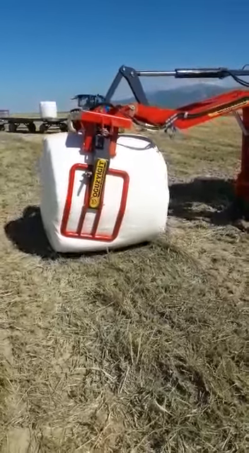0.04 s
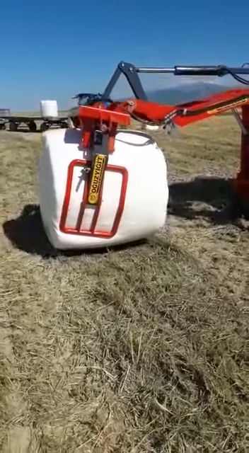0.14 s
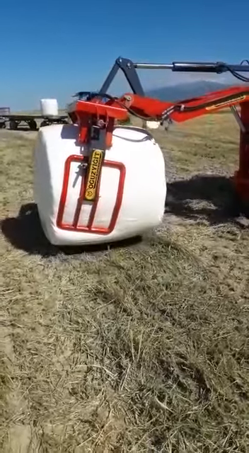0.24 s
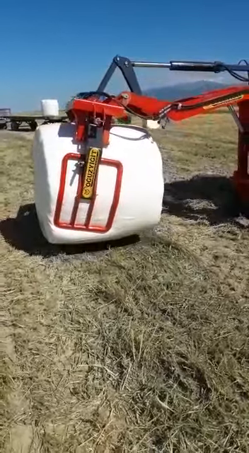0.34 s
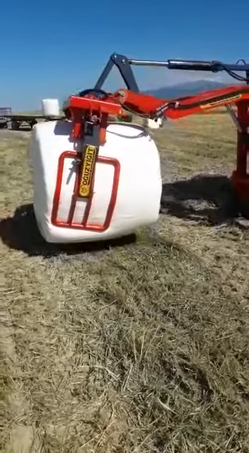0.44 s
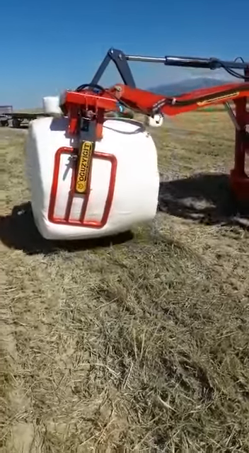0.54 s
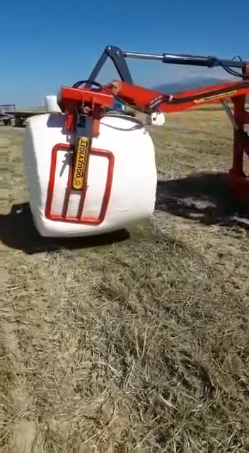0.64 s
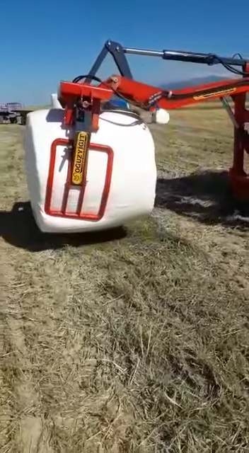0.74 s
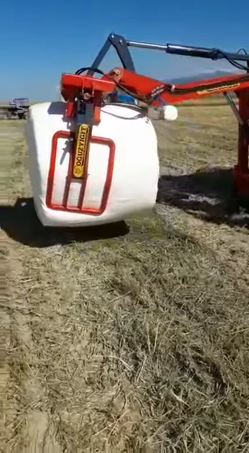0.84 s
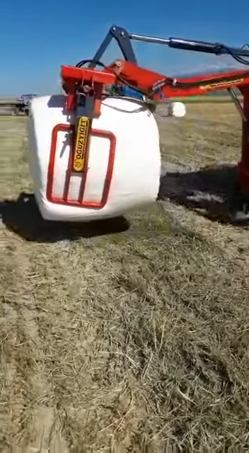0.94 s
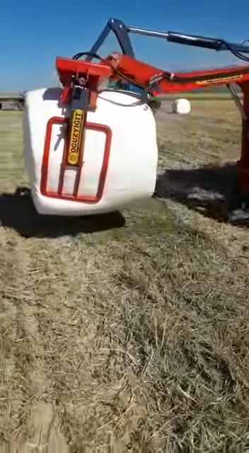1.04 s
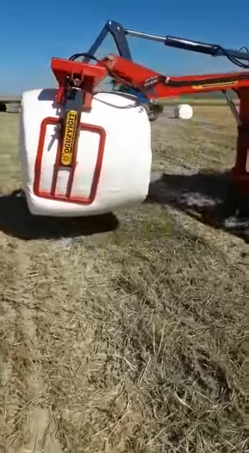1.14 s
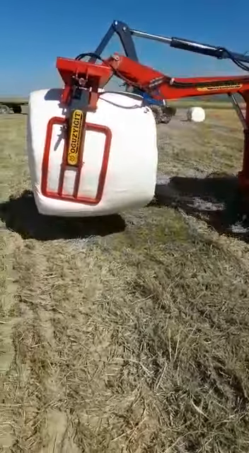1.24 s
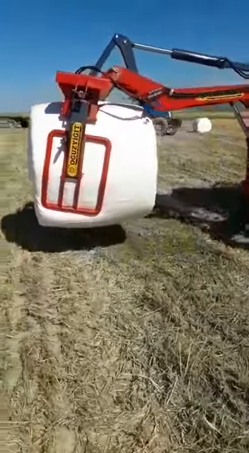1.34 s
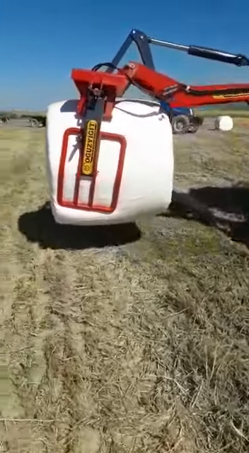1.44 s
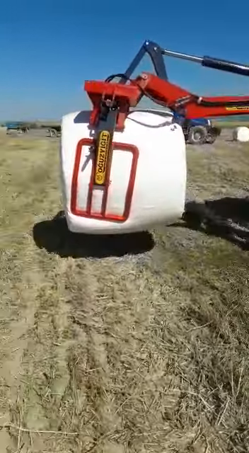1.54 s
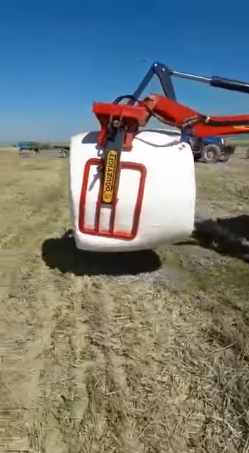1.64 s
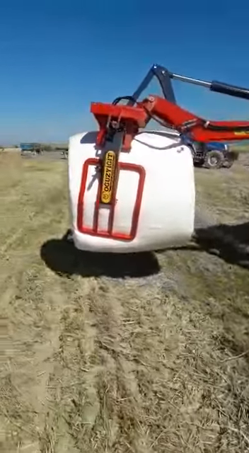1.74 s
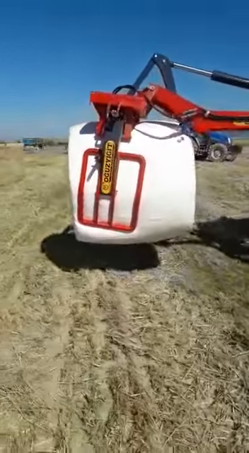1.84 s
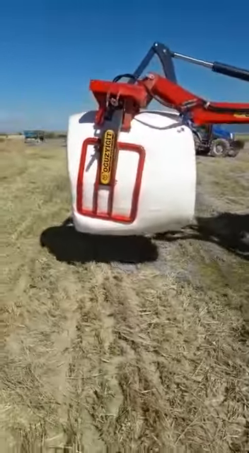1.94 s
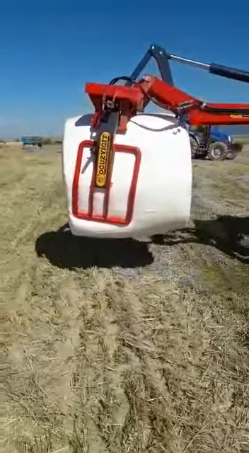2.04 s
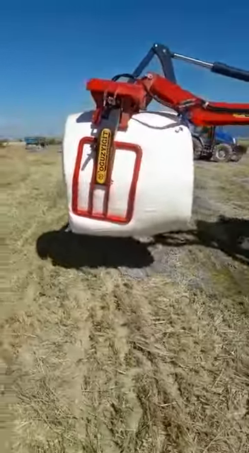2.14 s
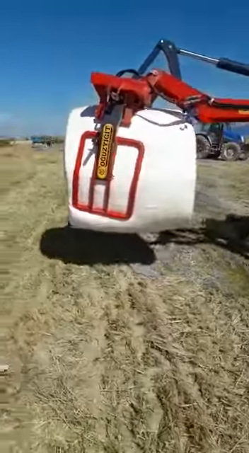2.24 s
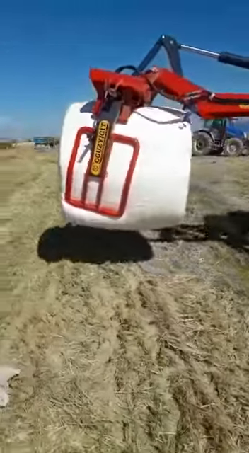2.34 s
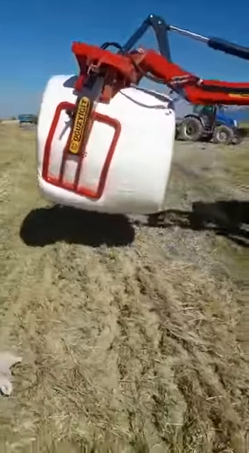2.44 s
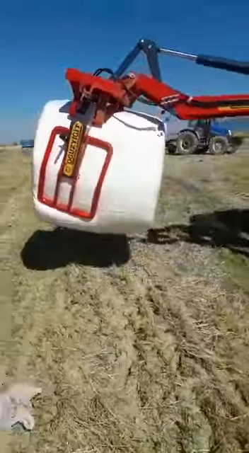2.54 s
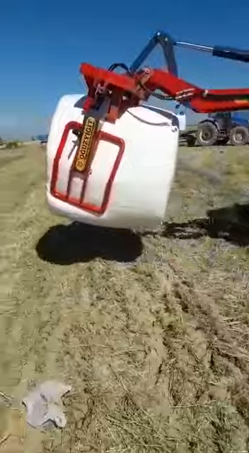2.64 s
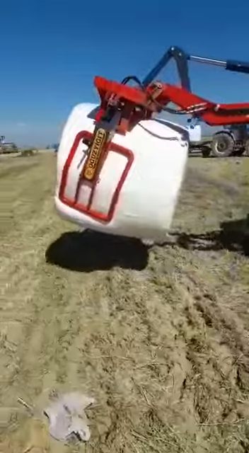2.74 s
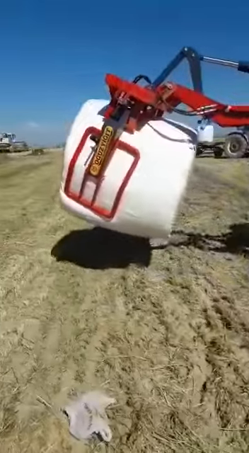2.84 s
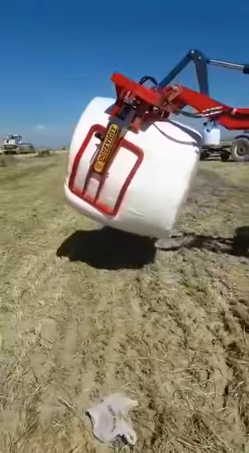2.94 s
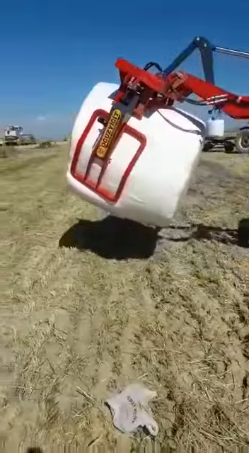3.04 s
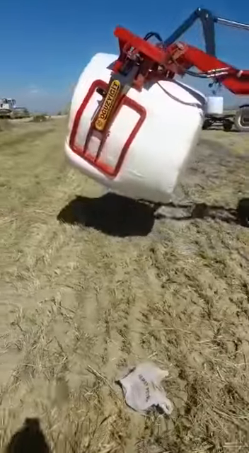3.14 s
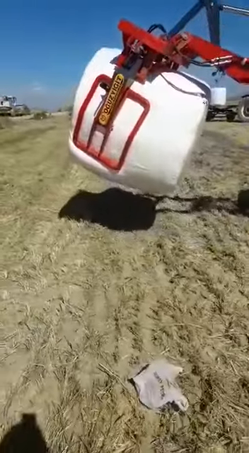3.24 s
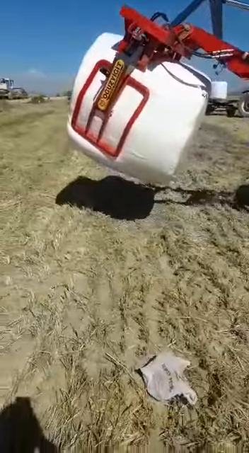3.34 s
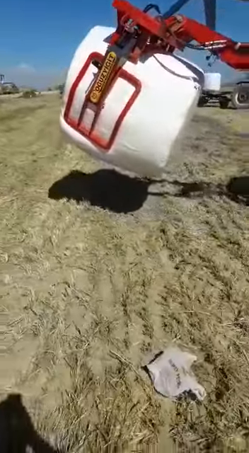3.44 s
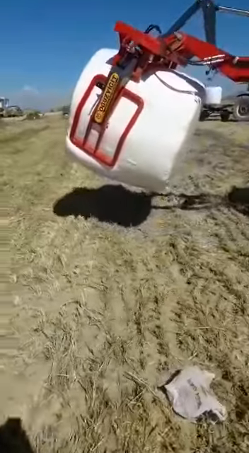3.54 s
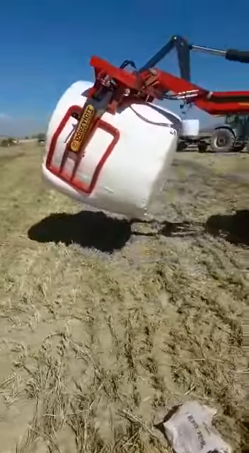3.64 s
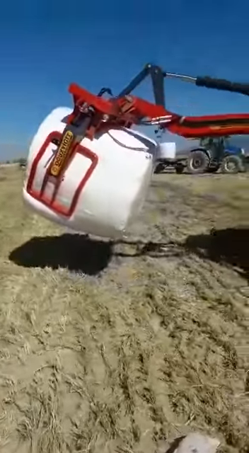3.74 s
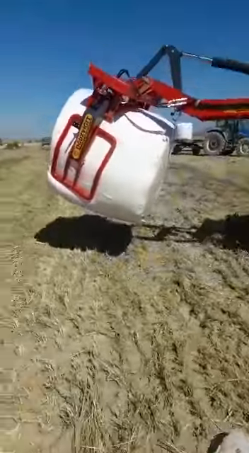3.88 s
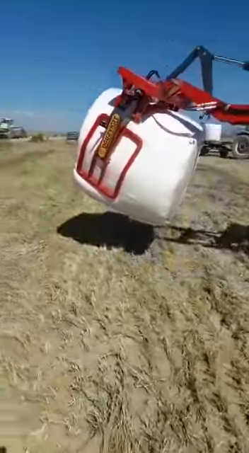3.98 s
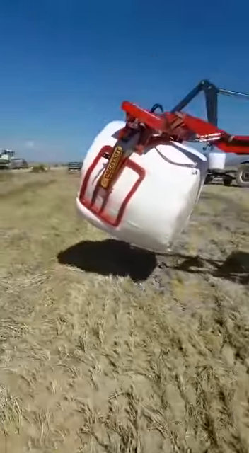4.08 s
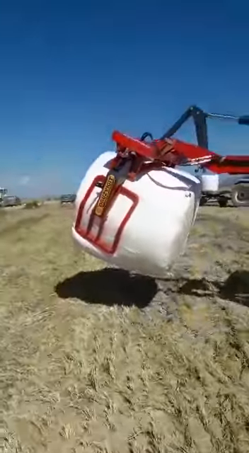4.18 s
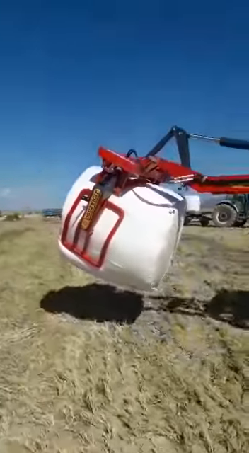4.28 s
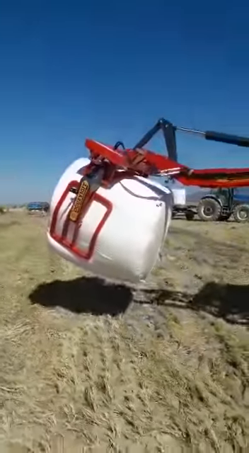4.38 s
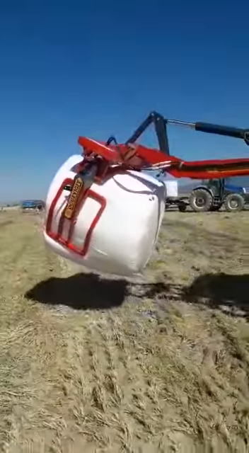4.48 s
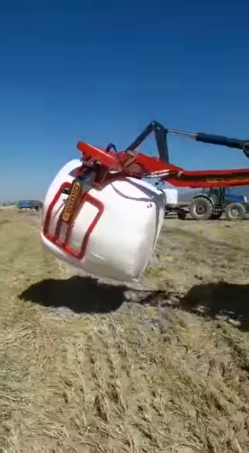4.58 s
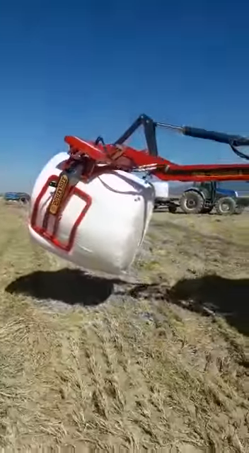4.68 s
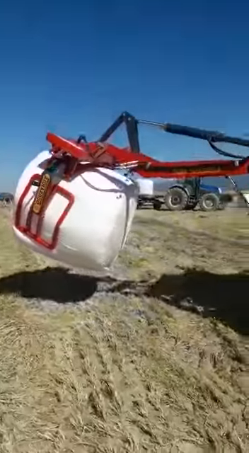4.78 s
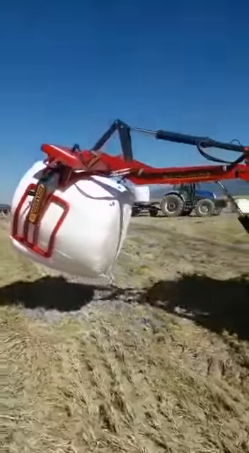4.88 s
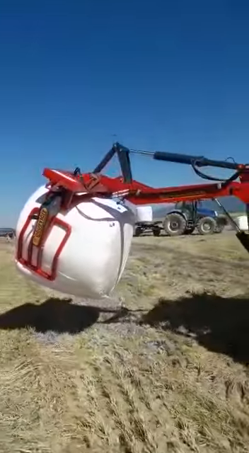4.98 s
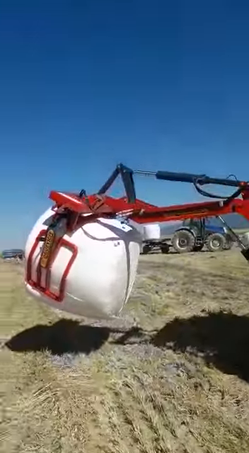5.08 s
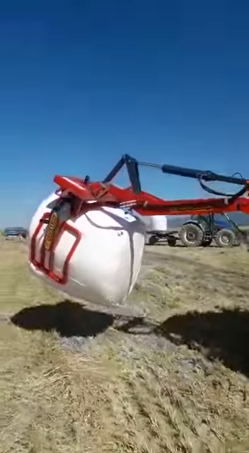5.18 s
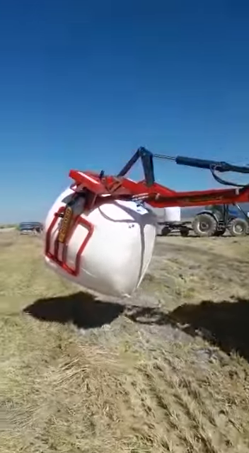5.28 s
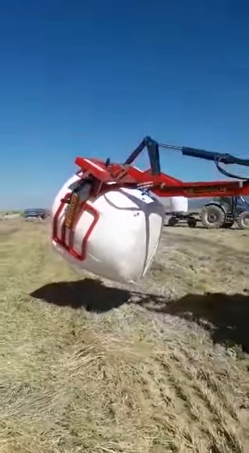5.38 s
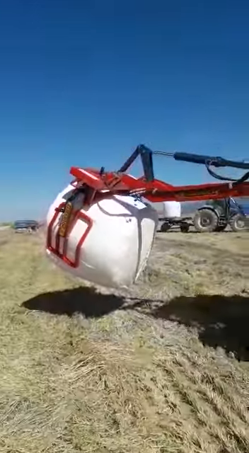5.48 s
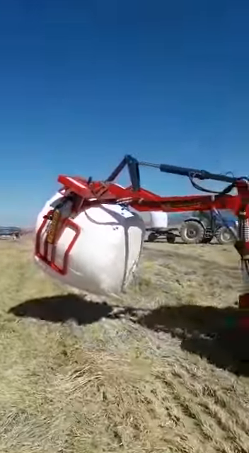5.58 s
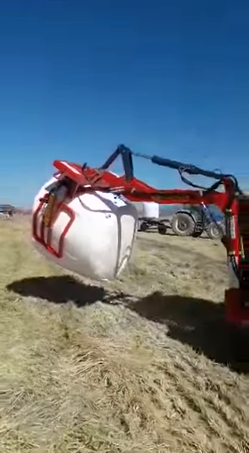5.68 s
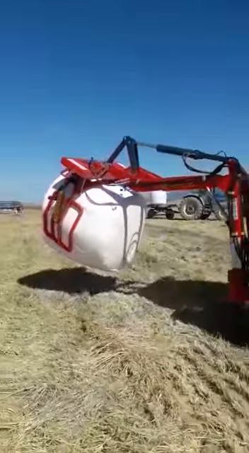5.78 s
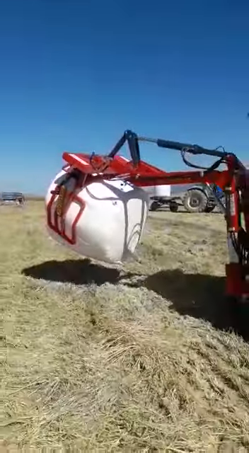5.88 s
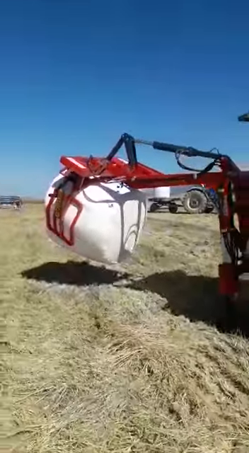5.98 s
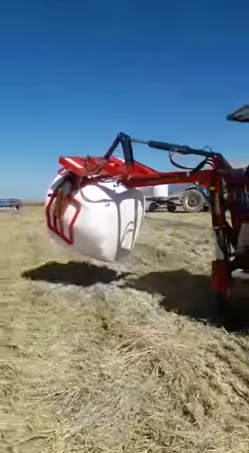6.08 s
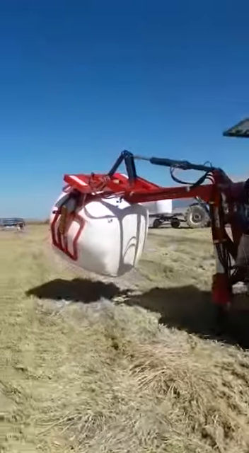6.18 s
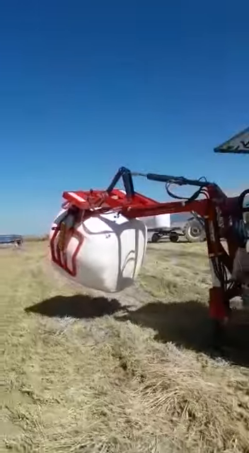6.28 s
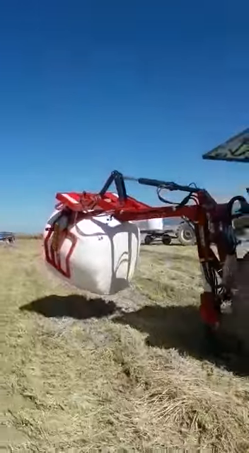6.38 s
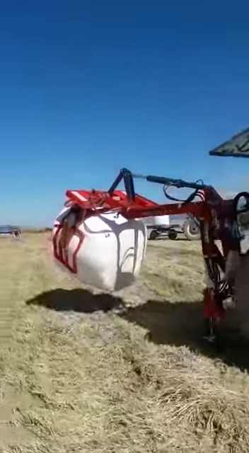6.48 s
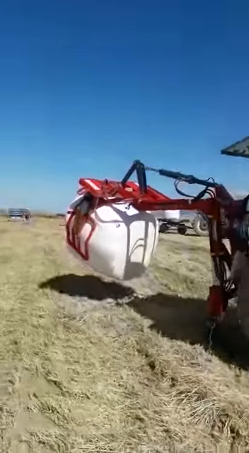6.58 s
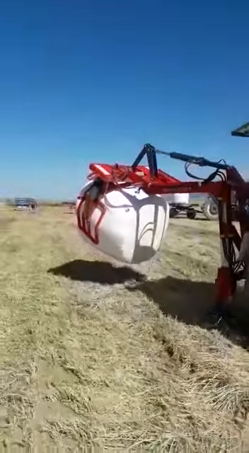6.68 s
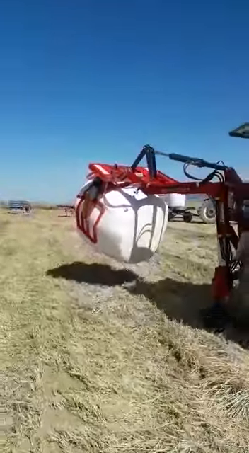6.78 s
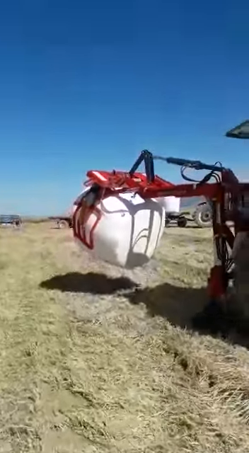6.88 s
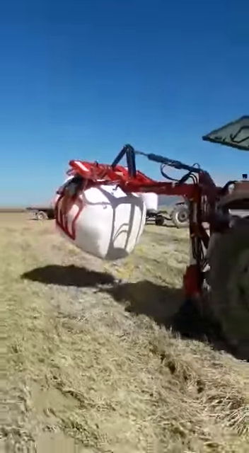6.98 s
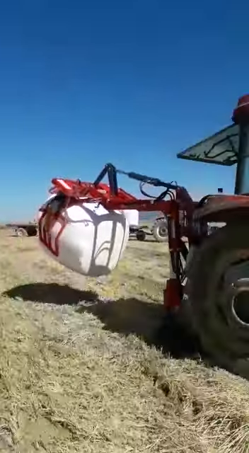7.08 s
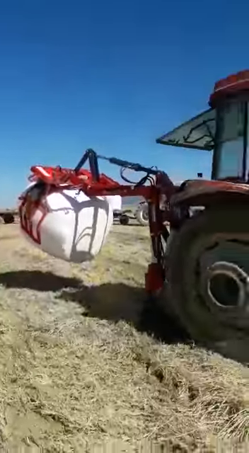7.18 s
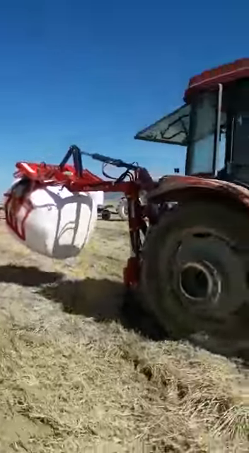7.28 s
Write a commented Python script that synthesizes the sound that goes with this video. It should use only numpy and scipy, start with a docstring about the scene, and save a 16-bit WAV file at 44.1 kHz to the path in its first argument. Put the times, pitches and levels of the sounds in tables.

```python
"""A diesel tractor idles in an open field, then lifts a wrapped bale with its oil-powered crane. The engine
clatters harder as the oil pump takes the load, then revs up and comes nearer, gears whining. Faint whines glide
now and then, the crane's arm clunks once and rumbles on, and there are hard clacks, dull thumps, a scuff, tiny
ticks and light wind. One loudness curve, the engine's clatter, leads the exhaust, the rattle, the whine and the
hiss, each by its own amount."""
import sys
import numpy as np
from scipy import signal
from scipy.fft import rfft, irfft, next_fast_len
from scipy.io import wavfile

SR = 44100
rng = np.random.default_rng(int(sys.argv[2]) if len(sys.argv) > 2 else 0)


def wav_out(sig):
    """Save sig, one row per channel (or a flat mono array), as 16-bit PCM at SR to the path in sys.argv[1]."""
    wavfile.write(sys.argv[1], SR, np.round(np.clip(np.atleast_2d(sig).T, -1, 1) * 32767).astype(np.int16))


N = 322812

# how hard each of the four cylinders fires: level_db
CYLINDER_DB = [1.8, 1.6, 1.7, 0.24]


def from_db(db):
    """Turn decibels into a number to multiply by."""
    return 10 ** (np.asarray(db) / 20)


def rms_one(x):
    """Scale a sound so that its average strength (rms) is one."""
    return x / np.sqrt(np.mean(x ** 2) + 1e-20)


def since(start_s):
    """Seconds since a moment, for every sample; negative before it."""
    return np.arange(N) / SR - start_s


def curve(points):
    """Join (time_s, value) points with straight lines, one value per sample."""
    return np.interp(since(0), *np.transpose(points))


def drift(rate_hz):
    """A smooth random wobble of about plus or minus one; a higher rate wobbles faster."""
    step, warm_up = 40, 2000
    pole = np.exp(-2 * np.pi * step * rate_hz / SR)
    draws = rng.standard_normal(N // step + warm_up + 2)
    slow = signal.lfilter([1], [1, -2 * pole, pole * pole], draws)[warm_up:]
    return np.interp(np.arange(N) / step, np.arange(len(slow)), rms_one(slow))


def colour(x, spectrum):
    """Filter a sound by (pitch_hz, level_db) points and scale it to strength one."""
    size = 2 * next_fast_len(N // 2 + SR // 10)
    hz, db = np.transpose(spectrum)
    log_hz = np.log(np.maximum(np.arange(size // 2 + 1) * SR / size, 1))
    beyond_ends = np.abs(log_hz - np.clip(log_hz, np.log(hz[0]), np.log(hz[-1])))
    shape_db = np.interp(log_hz, np.log(hz), db) - 40 * np.minimum(beyond_ends, 2)
    # a minimum-phase filter: it rings after a hit, never before
    cepstrum = irfft(np.log(from_db(shape_db)))
    response = np.exp(rfft(2 * cepstrum[:size // 2], size))
    return rms_one(irfft(rfft(x, size) * response)[:N])


def noise(spectrum):
    """Steady noise with the given tone colour."""
    return colour(rng.standard_normal(N), spectrum)


def grainy_noise(spectrum, grain_db, rate_hz):
    """Noise whose level flickers quickly, so it sounds rough."""
    return colour(rng.standard_normal(N) * from_db(grain_db * drift(rate_hz)), spectrum)


def resonate(x, hz, width_hz):
    """Make a sound ring around one pitch, at strength one."""
    pole = np.exp(-np.pi * width_hz / SR)
    feedback = [1, -2 * pole * np.cos(2 * np.pi * hz / SR), pole * pole]
    return rms_one(signal.lfilter([1, 0, -1], feedback, x))


def narrow_band(x, hz, width_hz):
    """Ring twice, leaving little but the sound near one pitch."""
    return resonate(resonate(x, hz, width_hz), hz, width_hz)


def swells(rows, attack_s, release_s):
    """Loudness of (start_s, end_s, level_db) events that rise, hold, and fade after their end."""
    power = 0
    for start_s, end_s, db in rows:
        rise = np.clip(since(start_s) / attack_s, 0, 1)
        fade = np.clip(1 - since(end_s) / release_s, 0, 1)
        power = power + (from_db(db) * rise * fade) ** 2
    return np.sqrt(power)


def strike(age_s, level_db, rise_s, fade_s):
    """Loudness of one hit: a quick rise, and a fall of 60 dB every fade_s."""
    age_s = np.clip(age_s, 0, 1)
    return from_db(level_db - 60 * age_s / fade_s) * (1 - np.exp(-age_s / rise_s))


def bursts(firings, decay, floor, uneven_db, repeat_share):
    """A noise burst at each firing, over a steady floor; part of it repeats every engine cycle."""
    index, cylinders = firings.astype(int), len(CYLINDER_DB)
    scatter_db = uneven_db * rng.standard_normal(index[-1] + 1)[index]
    strength = from_db(np.array(CYLINDER_DB)[index % cylinders] + scatter_db)
    pattern = rng.standard_normal(SR // 10)
    repeating = pattern[(firings / cylinders % 1 * len(pattern)).astype(int)]
    grain = np.sqrt(repeat_share) * repeating + np.sqrt(1 - repeat_share) * rng.standard_normal(N)
    age, rise = firings % 1, 0.066  # like decay, shares of the gap between firings
    return grain * (floor + strength * np.exp(-age / decay) * (1 - np.exp(-age / rise)))


def nearness():
    """How close the tractor is: 0 from afar, 1 right beside the listener."""
    return np.clip(since(5.97) / 0.38, 0, 1)


def follow_clatter(revs, base_db, slope, revved_db):
    """Loudness that moves slope dB for each dB of clatter and gains revved_db at full revs."""
    # the clatter grows with the engine's effort and nearness: time_s, level_db
    clatter = [(0.0, -59), (1.25, -54.5), (2.15, -56), (2.31, -53), (2.39, -43), (2.49, -35.5), (2.54, -39),
               (2.6, -35), (2.67, -38.5), (2.8, -34.5), (2.96, -35.5), (3.2, -39), (3.34, -35),
               (3.5, -37.5), (4.05, -39.5), (4.29, -35), (4.38, -45), (4.52, -45.5), (4.65, -41),
               (5.02, -41), (5.08, -35.5), (5.26, -30.5), (5.36, -32.5), (5.92, -32), (6.33, -25.5),
               (6.55, -26.5), (7.32, -26)]
    usual_db = -40
    return from_db(base_db + slope * (curve(clatter) - usual_db) + revved_db * revs)


def open_air():
    """The faint, steady noise of the open field."""
    # its tone colour: pitch_hz, level_db
    spectrum = [(60, 5), (450, 2), (700, -7), (950, -11), (1300, 0.5), (1650, -2.5), (2000, -2),
                (2700, -12), (4000, -11.5), (5500, -17), (8000, -26.5), (12000, -16.5)]
    return from_db(-64) * noise(spectrum)


def breeze():
    """Light gusts of wind make a low, uneven rumble."""
    # gusts: start_s, end_s, level_db
    gusts = [(2.15, 2.42, -40.5), (3.85, 4.05, -44), (4.24, 4.45, -37), (4.6, 5.0, -42), (4.95, 6.25, -43),
             (6.76, 7.32, -40.5)]
    calm_db, wobble_db = -54, 5.0
    strength = from_db(calm_db) + swells(gusts, attack_s=0.15, release_s=0.14)
    rumble = noise([(25, -19), (45, 1), (70, 4), (110, 3.5), (200, -10.0)])
    return strength * from_db(wobble_db * drift(6.4)) * rumble


def hiss(revs):
    """A thin, high hiss grows with the engine and swells now and then."""
    # swells: start_s, end_s, level_db
    surges = [(2.36, 2.6, -69), (2.86, 3.15, -68), (3.26, 3.46, -65), (5.42, 5.7, -66.5), (6.2, 6.68, -62)]
    # the hiss's tone colour: pitch_hz, level_db
    spectrum = [(8000, -32), (10000, -10.5), (11500, -1), (13500, 2), (16000, 2)]
    steady = from_db(-74.5)
    driven = follow_clatter(revs, base_db=-75.5, slope=1, revved_db=1.5)
    swelling = swells(surges, attack_s=0.072, release_s=0.07)
    strength = np.sqrt(steady ** 2 + driven ** 2 + swelling ** 2)
    return strength * grainy_noise(spectrum, grain_db=1.8, rate_hz=120)


def whirr(start_s, end_s, level_db):
    """A faint, high whirr comes and goes once."""
    strength = swells([(start_s, end_s, level_db)], attack_s=0.1, release_s=0.1)
    return strength * narrow_band(rng.standard_normal(N), hz=1970, width_hz=230)


def ticks(fade_s):
    """Tiny, bright ticks of noise start at once and die fast."""
    # ticks: start_s, level_db, pitch_hz
    hits = [(2.574, -60, 4200), (2.677, -59, 4200), (3.436, -56, 13500), (6.574, -56, 13500)]
    out = 0
    for start_s, db, hz in hits:
        age_s = since(start_s)
        grain = narrow_band(rng.standard_normal(N), hz, width_hz=hz / 3.7)
        out = out + (age_s > 0) * from_db(db - 60 * np.clip(age_s, 0, 1) / fade_s) * grain
    return out


def scuff(start_s, end_s, level_db):
    """A short, dry, grainy scuff leads into the first thump."""
    # its tone colour: pitch_hz, level_db
    spectrum = [(250, 2), (550, 0), (1000, -5), (2000, -21), (3500, -23), (5500, -32), (7000, -36),
                (9000, -46)]
    strength = swells([(start_s, end_s, level_db)], attack_s=0.008, release_s=0.023)
    return strength * grainy_noise(spectrum, grain_db=2, rate_hz=250)


def pins():
    """The crane's loose pins knock in their sleeves without ringing on."""
    # knocks: start_s, level_db
    hits = [(1.761, -43), (2.701, -31), (3.941, -41), (5.598, -27)]
    # a knock's tone colour: pitch_hz, level_db
    spectrum = [(200, 3.5), (400, 20), (800, -5), (1400, 3), (2500, -20), (4500, -35), (6000, -41),
                (9000, -58)]
    strength = sum(strike(since(start_s), db, rise_s=0.00094, fade_s=0.033) for start_s, db in hits)
    return strength * noise(spectrum)


def thumps(boost_db):
    """Soft, dull blows, each a low tone that dies almost at once."""
    # blows: start_s, level_db (before the boost), pitch_hz, fade_s
    hits = [(1.784, -15.5, 114, 0.042), (2.282, -23, 107, 0.065), (4.308, -11, 132, 0.057),
            (4.358, -19.5, 170, 0.076), (4.402, -23, 124, 0.063), (4.483, -21, 105, 0.047),
            (4.541, -14, 90, 0.046), (4.819, -18.5, 208, 0.051), (5.044, -14, 111, 0.051)]
    out = 0
    for start_s, db, hz, fade_s in hits:
        age_s = since(start_s)
        strength = strike(age_s, db + boost_db, rise_s=0.0066, fade_s=fade_s)
        out = out + strength * np.sin(2 * np.pi * hz * age_s)
    return out


def crane_clunk(peak_s):
    """Slack joints take up the load in a cluster of small impacts, and the crane's arm rumbles on."""
    # the clunk's tone colour: pitch_hz, level_db
    clunk_spectrum = [(50, 2), (100, 7), (300, 3), (600, -3.5), (1300, -14), (2500, -25), (4500, -38.5),
                      (6500, -51.5), (8500, -61), (14000, -45.5)]
    # the rumble's tone colour: pitch_hz, level_db
    rumble_spectrum = [(50, -9.5), (130, 7.5), (280, 3), (500, -20), (1200, -16), (2500, -43), (5000, -48)]
    age_s = since(peak_s)
    rise, clunk_fall, rumble_fall = 304, 400, 69  # dB per second
    clunk_db = -21 - np.maximum(-age_s * rise, age_s * clunk_fall)
    rumble_db = -28 - np.maximum(-age_s * rise, age_s * rumble_fall)
    clunk = from_db(clunk_db) * grainy_noise(clunk_spectrum, grain_db=2.0, rate_hz=200)
    return clunk + from_db(rumble_db) * noise(rumble_spectrum)


def gliding_whines(wobble_db):
    """Thin whines sing in unsteady glides that swell and fade."""
    # squeals: start_s, length_s, pitch_hz, rise_hz, mid_glide_bend_hz, level_db
    squeals = [(0.904, 0.11, 1330, 70, -3, -63), (0.967, 0.13, 1270, 99, 6, -56),
               (1.14, 0.36, 1235, 52.5, -5, -52.5), (1.38, 0.27, 1303, 95, 6, -58.5),
               (1.296, 0.31, 940, 73, 0.5, -58), (2.142, 0.55, 1005, 23, 0.5, -54),
               (2.25, 0.36, 1260, 99.5, 5.5, -49.5), (3.078, 0.61, 1422, -57.5, 33.5, -44),
               (3.062, 0.603, 1000, -2.5, 37.5, -38.5), (3.36, 0.27, 1323, -22, 1.5, -46),
               (4.549, 0.46, 1278, 173, -1.5, -49), (4.765, 0.25, 1156, 70, -1, -48),
               (5.237, 0.28, 1353, 65.5, 1.5, -38), (5.878, 0.37, 1434, 77, -0.5, -35.5)]
    out = 0
    for start_s, length_s, hz, rise_hz, bend_hz, db in squeals:
        progress = np.clip(since(start_s) / length_s, 0, 1)
        opening = np.sin(np.pi * progress)
        pitch_hz = hz + rise_hz * progress + bend_hz * opening
        phase = 2 * np.pi * np.cumsum(pitch_hz) / SR + 0.59 * drift(35)
        out = out + opening * from_db(db + wobble_db * drift(22)) * np.sin(phase)
    return out


def oil_pump(firings, hum_hz):
    """The engine drives a pump whose pressure ripple sets the oil lines humming."""
    # spells under pressure: start_s, end_s, level_db
    strokes = [(2.35, 4.35, -42.5), (3.14, 3.6, -34.5), (4.1, 4.32, -34)]
    ripple = bursts(firings, decay=0.33, floor=0.34, uneven_db=-3.5, repeat_share=0.092)
    hum = narrow_band(ripple, hum_hz, width_hz=68)
    throb_db = 4.5 + 0.5 * np.cos(np.pi * firings)  # peaks on every second firing
    tone = from_db(throb_db) * np.sin(2 * np.pi * hum_hz * since(0) + 0.77 * drift(12))
    return swells(strokes, attack_s=0.15, release_s=0.095) * rms_one(hum + tone)


def gears(firings, revs):
    """Gear teeth whine in step with the engine and their case rings; one tone flares up at times."""
    # gear tones: multiple_of_firing_rate, far_db, near_db
    gear_tones = [(13.43, -7.5, -7), (14.36, -11, -9), (16.8, -12.5, -16), (18.33, -22, -7),
                  (19.6, -15, -27), (22.15, -14, -15), (25.27, -19.5, -4), (26.44, -20, -4.5),
                  (27.2, -5.5, -4.5), (27.97, -11, -14), (33.1, -19, -13), (52.4, -20, -15)]
    # flares: start_s, end_s, level_db
    flares = [(5.06, 5.19, -36), (5.72, 5.9, -33), (6.31, 6.355, -24), (6.385, 6.44, -24.5),
              (6.44, 6.66, -32.5), (6.66, 6.74, -23.5), (6.755, 6.86, -23.5), (6.88, 6.95, -29),
              (6.94, 7.04, -24.5), (7.18, 7.215, -25.5), (7.255, 7.32, -26.5)]
    near, tones, flare_multiple = nearness(), 0, 27.2
    for multiple, far_db, near_db in gear_tones:
        level_db = far_db + near * (near_db - far_db) + 2.5 * drift(39)
        tones = tones + from_db(level_db) * np.sin(2 * np.pi * multiple * firings + 0.61 * drift(21))
    case = resonate(noise([(900, -12.5), (1400, 1.0), (1900, -16)]), hz=1460, width_hz=95)
    whine = tones + from_db(-7.5) * case
    flare = from_db(1.5 * drift(24)) * np.sin(2 * np.pi * flare_multiple * firings + 0.3 * drift(20))
    return (follow_clatter(revs, base_db=-62.5, slope=0.8, revved_db=21.3) * whine
            + swells(flares, attack_s=0.025, release_s=0.029) * flare)


def diesel_clacks():
    """Now and then the engine cracks out a harder clack, short and metallic."""
    # clacks: start_s, level_db
    hits = [(2.476, -46), (2.573, -54), (2.733, -40), (2.76, -39), (2.824, -41), (2.956, -36), (3.333, -36),
            (3.562, -44), (6.317, -30), (6.337, -24), (6.457, -34), (6.675, -28), (6.714, -26),
            (7.056, -29)]
    # a clack's tone colour: pitch_hz, level_db
    spectrum = [(800, -20), (1500, 10), (2300, 7), (3200, -4), (4200, -19), (5500, -32), (8000, -52)]
    strength = sum(strike(since(start_s), db, rise_s=0.00099, fade_s=0.054) for start_s, db in hits)
    return strength * noise(spectrum)


def hollow_knock(firings, firing_hz, revs, delay_s):
    """One cylinder knocks hollowly once per engine cycle, hardest when working hard at low speed."""
    # the knock's ringing tones: pitch_hz, level_db
    tones = [(335, 2), (450, -8)]
    age_s = np.maximum(firings % len(CYLINDER_DB) / firing_hz - delay_s, 0)
    ring = sum(from_db(db) * np.sin(2 * np.pi * hz * age_s + 0.73 * drift(10)) for hz, db in tones)
    strength = strike(age_s, level_db=2 * drift(7.3), rise_s=0.0032, fade_s=0.055)
    return follow_clatter(revs, base_db=-22.5, slope=0.76, revved_db=-8.5) * strength * ring


def injectors(firings, revs):
    """The fuel injectors rattle at each firing; their needles snap more sharply at speed."""
    # the rattle's tone colour: pitch_hz, level_db
    rattle_spectrum = [(1300, -15), (1800, 3), (2200, 5), (2700, -1), (3100, -11), (4000, -12), (5000, -16),
                       (6300, -29.5), (8000, -60.5)]
    # the needles' sharp treble: pitch_hz, level_db
    needle_spectrum = [(2700, -10.5), (3700, 5.5), (4500, 9), (5500, 0.5), (6500, -10.5), (8000, -36.5),
                       (10000, -33.5)]
    snaps = bursts(firings, decay=0.59, floor=1.0, uneven_db=4.2, repeat_share=0.45)
    needles = from_db(-23 + 11.5 * revs) * colour(snaps, needle_spectrum)
    rattle = colour(snaps, rattle_spectrum) + needles
    return follow_clatter(revs, base_db=-57.5, slope=1.577, revved_db=0.3) * rattle


def engine_block(firings, revs):
    """Each firing knocks on the engine's metal body and sets its covers ringing."""
    # the body's tone colour: pitch_hz, level_db
    spectrum = [(330, -23.5), (520, 3), (670, 0), (850, -1.5), (1000, -3), (1350, -3), (1600, -10.5),
                (2000, -21), (3000, -24.5)]
    # ringing covers: pitch_hz, width_hz, level_db
    covers = [(442, 11, -28.5), (642, 23, -29.5), (795, 26, -20.5), (1000, 8.5, -36), (1394, 40, -45),
              (2270, 18, -43.5), (2730, 21, -29)]
    knocks = bursts(firings, decay=0.4, floor=1.0, uneven_db=3.2, repeat_share=0.83)
    ringing = sum(from_db(db) * resonate(knocks, hz, width_hz) for hz, width_hz, db in covers)
    body = colour(knocks, spectrum) + ringing
    return follow_clatter(revs, base_db=-40.5, slope=1.05, revved_db=0.74) * body


def exhaust_puffs(firings, revs):
    """Each firing sends a puff out of the exhaust pipe."""
    # the pipe's tone colour: pitch_hz, level_db
    spectrum = [(25, -35.5), (45, -24.5), (75, -11), (110, -2), (170, -0.5), (250, 2.2), (300, -1.5),
                (380, -1.44), (460, -5.5), (600, -20.5), (900, -42)]
    puffs = bursts(firings, decay=0.31, floor=0.83, uneven_db=0.55, repeat_share=0.48)
    return follow_clatter(revs, base_db=-35.5, slope=0.61, revved_db=4.3) * colour(puffs, spectrum)


def exhaust_drone(firings, revs):
    """The exhaust drones in low tones whose balance shifts with load, speed and nearness."""
    # tones: multiple_of_firing_rate, idle_db, lifting_db, fast_db, near_db
    tones = [(1, -13, -24, -13.5, -20), (2, -19, -8, -1, 0), (2.75, -7, -10, -19.5, -19),
             (3, 4, -6, -1.5, 0), (4, 0, 0.5, -3, 1.5), (5, 1.5, -0.5, -5, -7), (6, -5, -0.5, -7, -0.5),
             (6.75, -7, -15, -24, -10.5), (7, -2, -6, -7, -4.5), (7.17, -7, 1, -1, -1.5),
             (8, 3, -17, -7.5, -11), (8.45, -15, -20, -12, -5), (9, -14, -31, -14, -3),
             (9.45, -22, -20, -8.5, -8.5), (10, -7.5, -9.5, -11, -10), (11, -8, -0.5, -20, -30),
             (13, -12, -19.5, -19, -19)]
    # how hard the crane works: time_s, load (0 to 1)
    crane_load = [(2.2, 0.36), (2.55, 1), (4.3, 0.85), (4.6, 1)]
    # level added to the main hum: time_s, extra_db
    hum_boost = [(4.95, -2), (5.15, 8), (5.3, 6.5), (5.48, -8), (5.68, -5), (5.82, 8), (6.3, 3), (6.58, -2),
                 (6.68, 7.5), (6.85, -9.5), (7.2, 1)]
    load, near, hum_multiple = curve(crane_load), nearness(), 3
    wobble_db, wobble_radians = 2.0 - 0.54 * near, 0.15 + 0.043 * near
    drone = 0
    for multiple, idle_db, lifting_db, fast_db, near_db in tones:
        low_revs_db = idle_db + load * (lifting_db - idle_db)
        high_revs_db = fast_db + near * (near_db - fast_db)
        level_db = (1 - revs) * low_revs_db + revs * high_revs_db + wobble_db * drift(9.0)
        if multiple == hum_multiple:
            level_db = level_db + curve(hum_boost)
        phase = 2 * np.pi * (multiple * firings + rng.random())
        phase = phase + wobble_radians * np.sqrt(multiple) * drift(7.7)
        drone = drone + from_db(level_db) * np.sin(phase)
    return follow_clatter(revs, base_db=-39, slope=0.42, revved_db=6.6) * drone


def scene():
    """The tractor, its crane and the open field, mixed into one channel."""
    # engine speed: time_s, firings_per_s
    speed = [(0.0, 30.2), (0.25, 28.55), (1.8, 30.9), (2.3, 31.0), (2.5, 29.3), (2.75, 32.9), (3.1, 30.75),
             (3.5, 30.8), (4.4, 33.3), (5.08, 48.6), (5.55, 52.2), (5.85, 50.4), (6.22, 52.2), (6.75, 49.6),
             (7.32, 48.5)]
    firing_hz, idle_hz, working_hz = curve(speed), 30.4, 49
    firings = np.cumsum(firing_hz) / SR  # how many times a cylinder has fired so far
    revs = np.clip((firing_hz - idle_hz) / (working_hz - idle_hz), 0, 1)  # 0 idling, 1 full revs
    engine = exhaust_puffs(firings, revs) + engine_block(firings, revs) + injectors(firings, revs)
    engine += exhaust_drone(firings, revs) + hollow_knock(firings, firing_hz, revs, delay_s=0.00392)
    engine += diesel_clacks() + gears(firings, revs)
    crane = oil_pump(firings, hum_hz=351.5) + gliding_whines(wobble_db=3.5)
    crane += whirr(start_s=0.18, end_s=0.7, level_db=-73)
    knocks = thumps(boost_db=7.0) + crane_clunk(peak_s=4.326) + pins() + ticks(fade_s=0.026)
    background = breeze() + scuff(start_s=1.752, end_s=1.792, level_db=-54.5) + open_air() + hiss(revs)
    return (engine + crane + knocks + background)[None]


def record(dry):
    """Cut off the very highest treble steeply."""
    cutoff_hz = 15900
    return signal.sosfilt(signal.ellip(10, .1, 80, cutoff_hz, fs=SR, output="sos"), dry)


dry = scene()
out = record(dry)
wav_out(out)
```